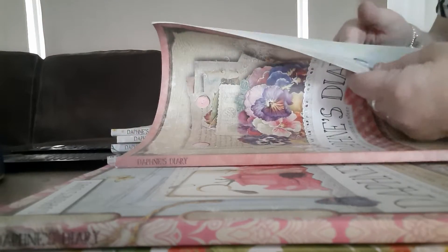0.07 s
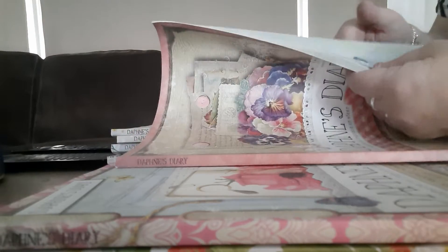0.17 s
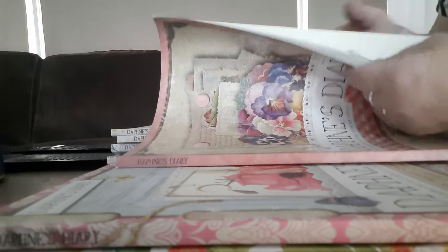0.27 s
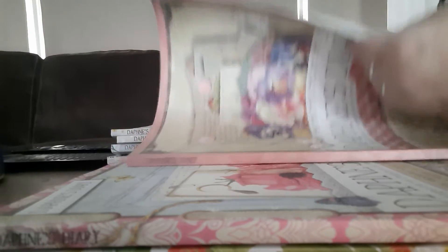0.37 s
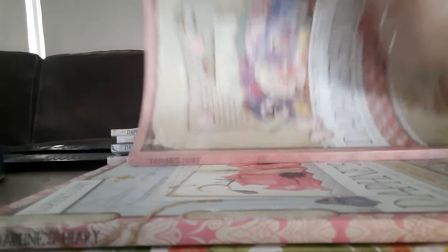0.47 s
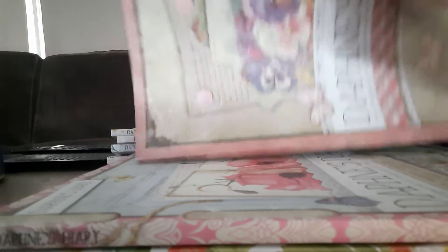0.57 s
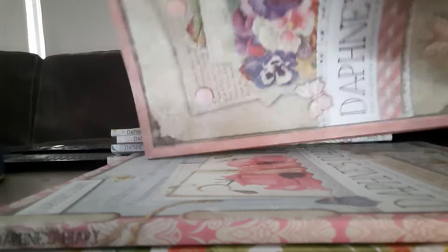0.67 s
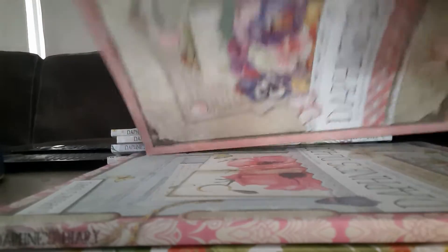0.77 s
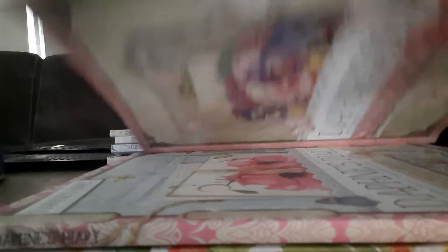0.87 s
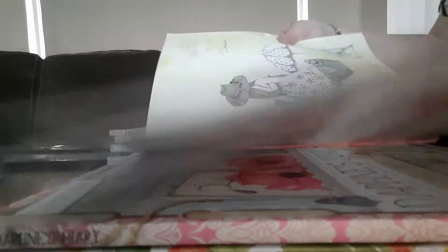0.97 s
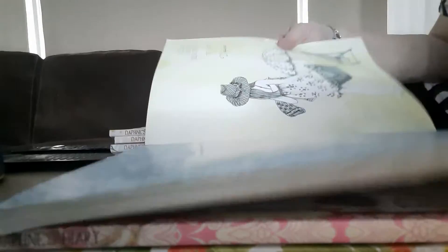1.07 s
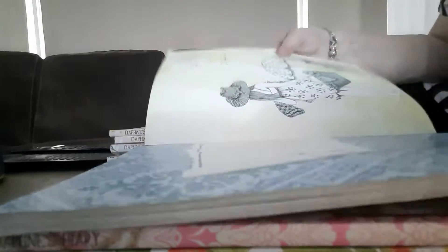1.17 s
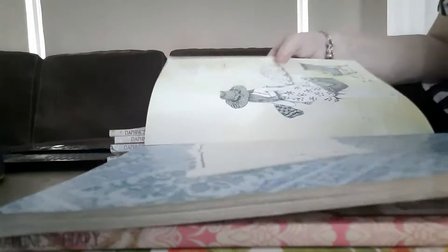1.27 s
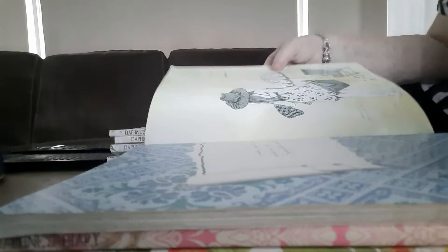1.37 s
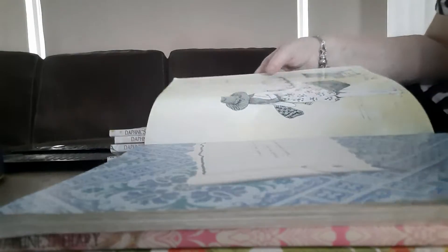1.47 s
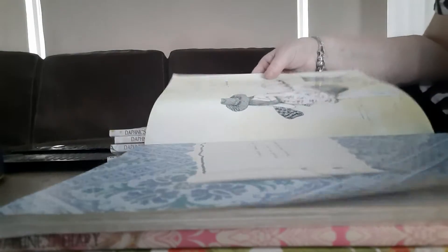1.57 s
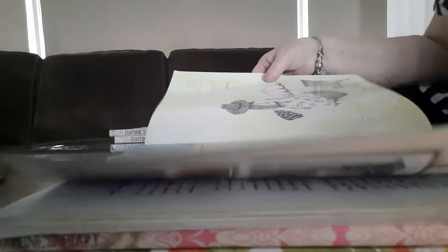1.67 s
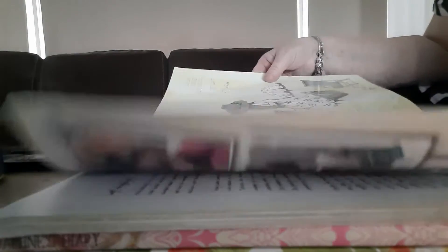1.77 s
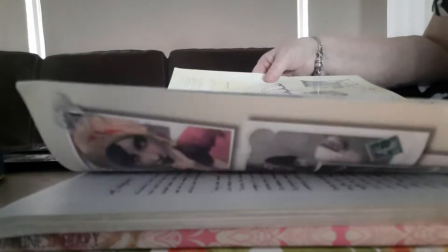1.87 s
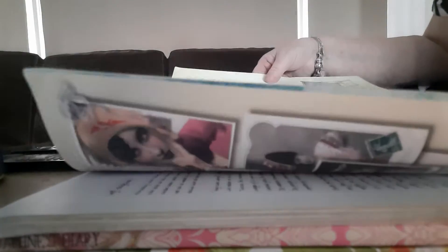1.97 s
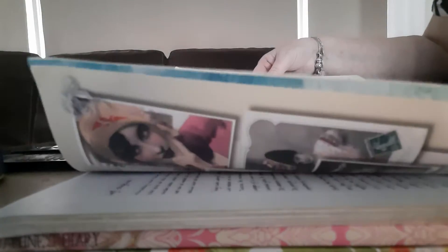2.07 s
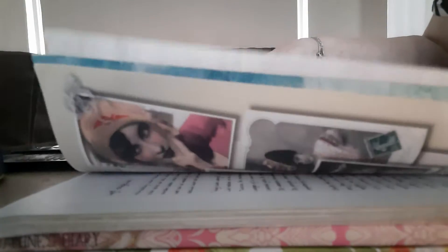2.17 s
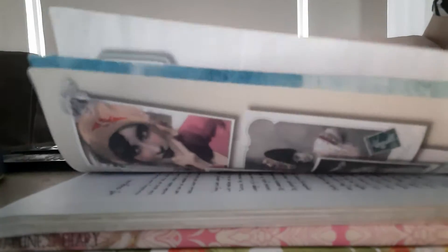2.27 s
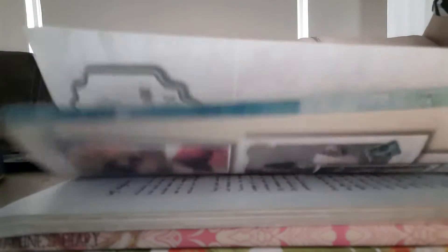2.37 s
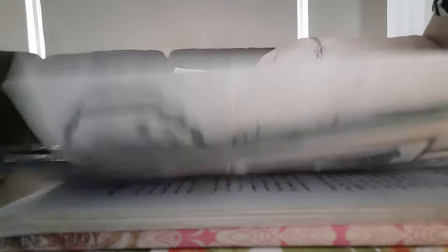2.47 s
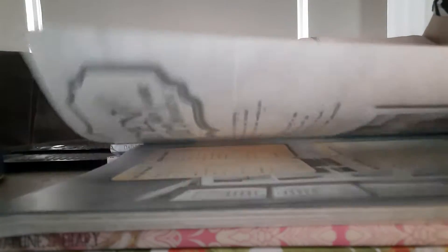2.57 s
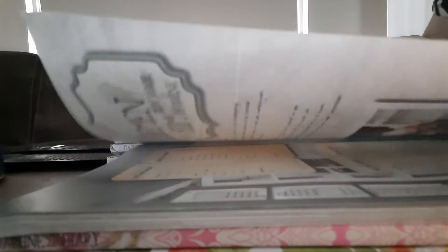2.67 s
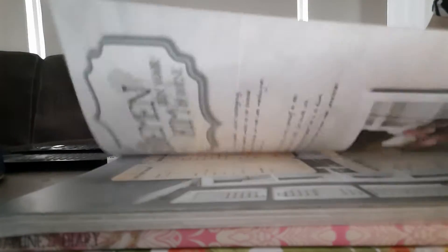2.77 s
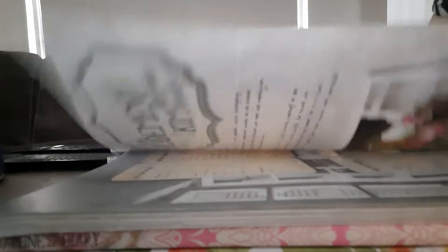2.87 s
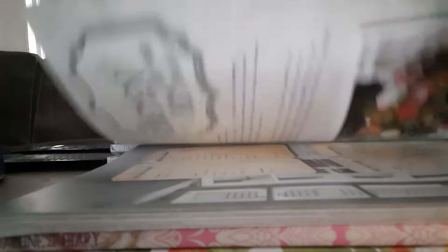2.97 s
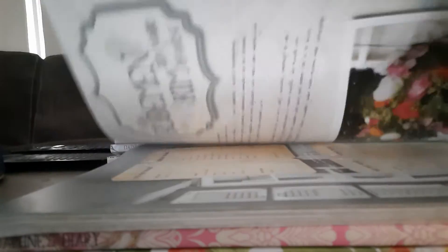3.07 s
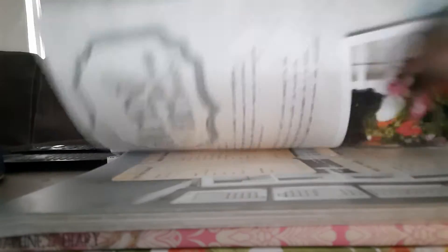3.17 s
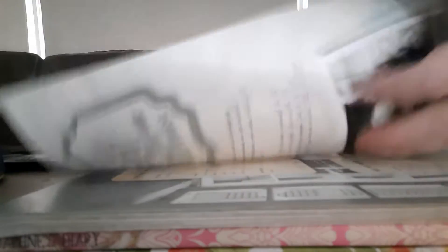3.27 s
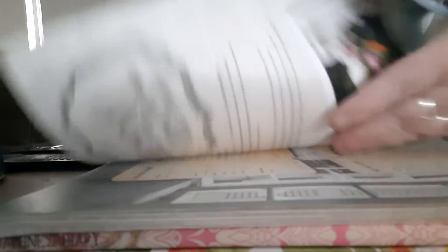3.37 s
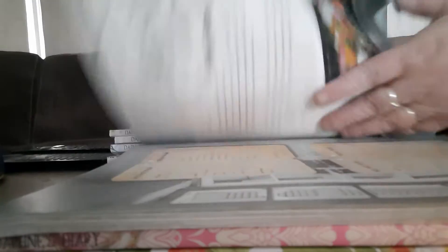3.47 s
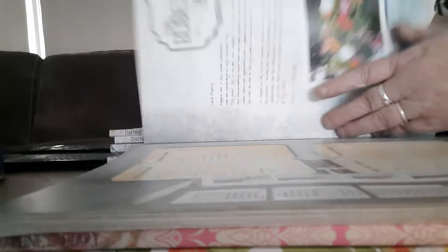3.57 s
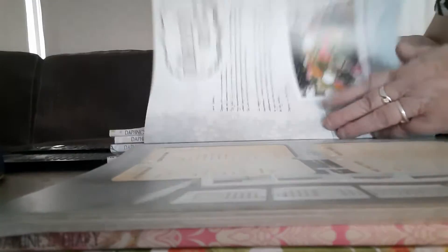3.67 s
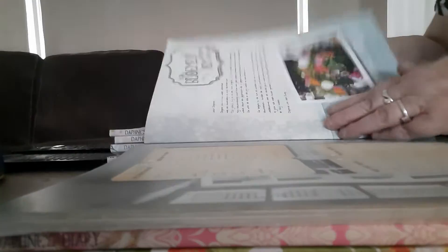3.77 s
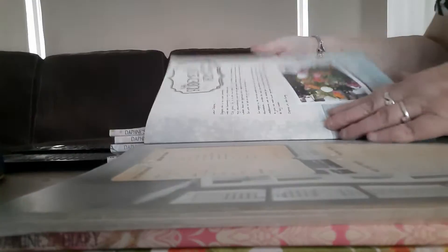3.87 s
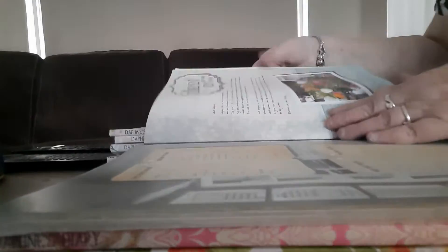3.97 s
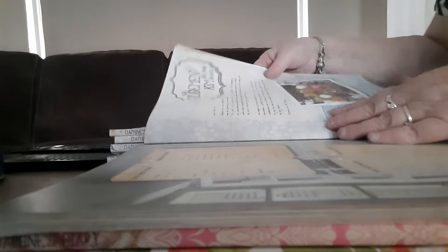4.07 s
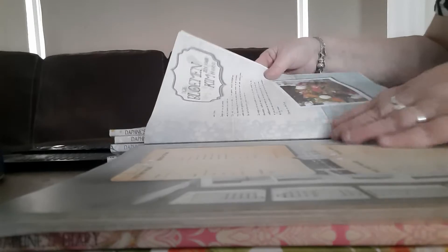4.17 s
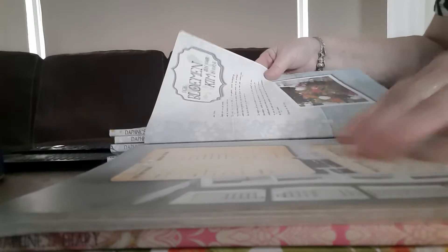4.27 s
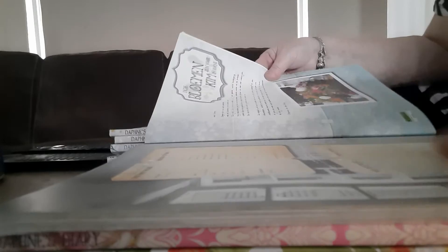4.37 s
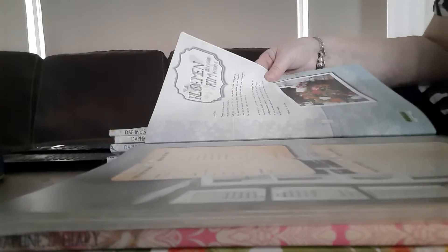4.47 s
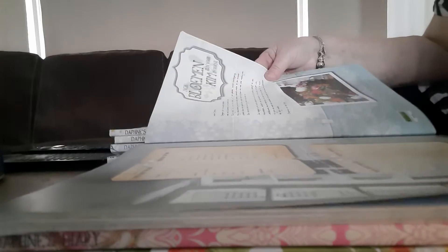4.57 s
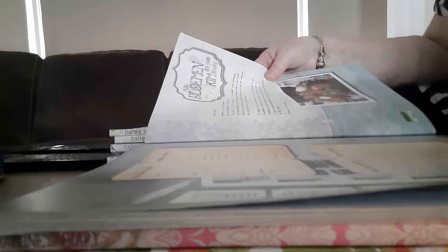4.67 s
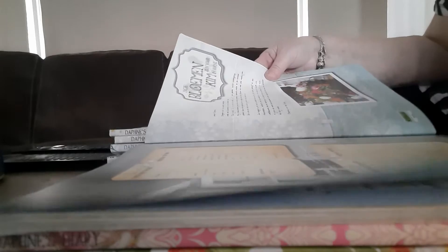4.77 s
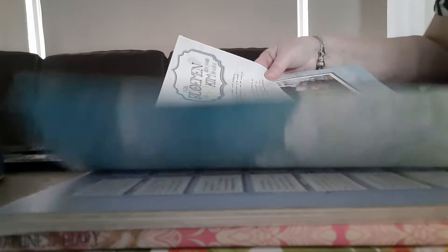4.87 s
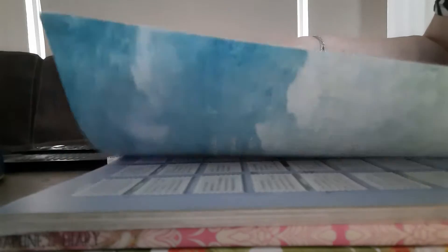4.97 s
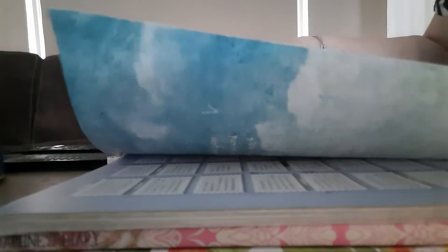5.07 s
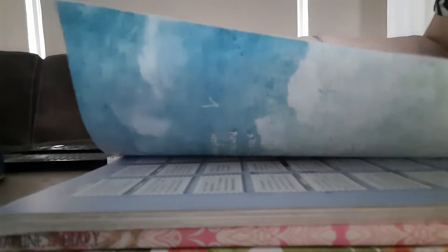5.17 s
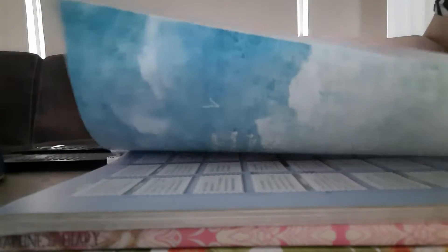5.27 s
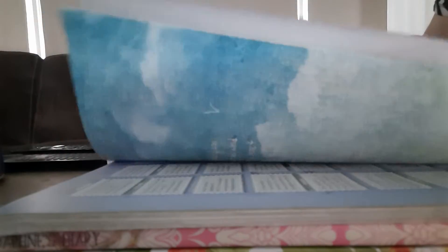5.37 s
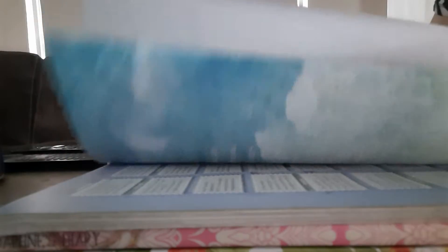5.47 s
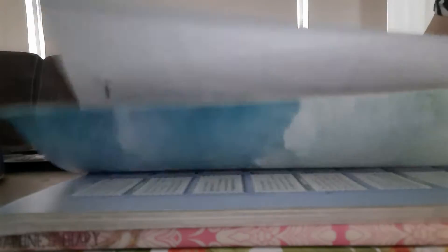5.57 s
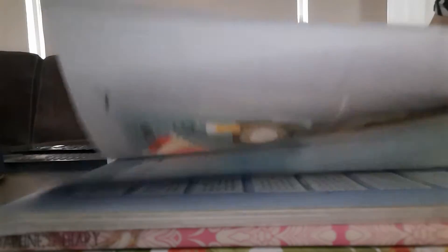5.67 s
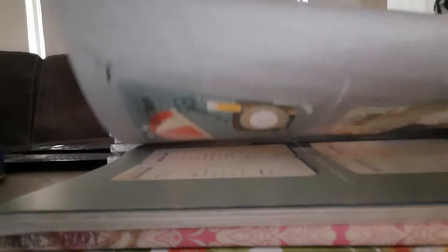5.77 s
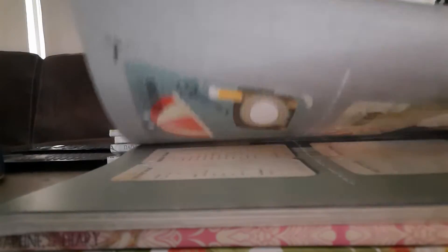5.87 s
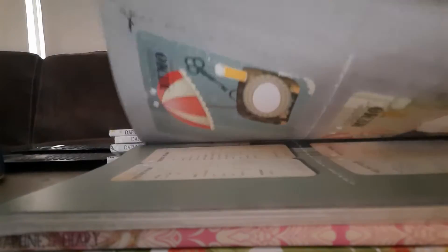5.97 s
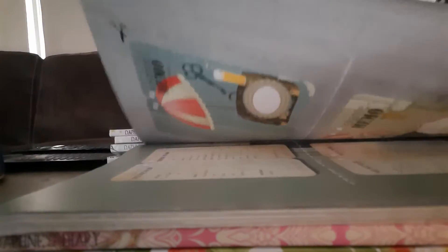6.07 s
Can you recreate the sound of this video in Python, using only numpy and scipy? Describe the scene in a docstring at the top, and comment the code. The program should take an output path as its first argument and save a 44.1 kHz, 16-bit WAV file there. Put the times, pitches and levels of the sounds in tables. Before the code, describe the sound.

Right beside a stereo microphone in a quiet living room, a glossy magazine is leafed through. Soft flaps and a faint bracelet tinkle come first, then hissing slides of paper. A cluster of hard snaps breaks out near the middle, rustling follows, then another sharp crack. After a quiet pause, gentle rubbing resumes and ends in a firmer flap.

```python
"""Faint room tone, then a soft flap and a snap: glossy magazine pages turned right beside a stereo microphone.
Sheets slide with a fine hiss and crackle (shaped noise), rumble softly as they bend (grainy noise), and buckle
with flaps and sharp snaps (short swings, trembling and cracks). Puffs of air thump low at the microphone.
A bracelet tinkles faintly early on (decaying sines); the living room answers the paper with a short tail."""
import sys
import numpy as np
from scipy import signal
from scipy.fft import rfft, irfft, next_fast_len
from scipy.io import wavfile

SR = 44100
rng = np.random.default_rng(int(sys.argv[2]) if len(sys.argv) > 2 else 0)


def file_out(sig):
    """Save sig as 16-bit WAV at sys.argv[1]."""
    # one column per channel
    cols = np.atleast_2d(sig).T
    # limit, then scale
    lim = np.clip(cols, -1, 1)
    pcm = np.round(lim * 32767).astype(np.int16)
    wavfile.write(sys.argv[1], SR, pcm)


N = 269142
TIME = np.arange(N) / SR   # seconds
FFT_SIZE = 2 * next_fast_len(N // 2 + SR // 2)   # padded so that filtering does not wrap round
FFT_HZ = np.maximum(np.arange(FFT_SIZE // 2 + 1) * SR / FFT_SIZE, 1)

# The two microphone ports. Each row: frequency in Hz, left-right level difference in dB,
# likeness of diffuse sound at the two ports (0 to 1).
PORTS = [(99.9, 3.5, 0.85), (730, -2, 0.99), (1590, -0.5, 0.12), (6000, 3, 0.18), (12800, -3.5, 0.11)]


def from_db(db):
    """Decibels to gain."""
    return 10 ** (np.asarray(db) / 20)


def rms_one(x):
    """Scale to unit power."""
    return x / np.sqrt(np.mean(x ** 2) + 1e-20)


def at_hz(points, hz, axis=1):
    """Read one column of a table on a log-frequency axis."""
    table = np.array(points)
    return np.interp(np.log(hz), np.log(table[:, 0]), table[:, axis])


def in_time(rows, axis=1):
    """Read one column of a curve at every sample."""
    table = np.array(rows)
    return np.interp(TIME, table[:, 0], table[:, axis])


def panned(db):
    """Left and right gains for a level difference."""
    return from_db(np.array([[.5], [-.5]]) * db)


def band(x, low_hz, high_hz):
    """Causal band-pass."""
    edges_hz = [low_hz, min(high_hz, SR * 9 / 20)]
    return signal.sosfilt(signal.butter(2, edges_hz, "band", fs=SR, output="sos"), x)


def drift(per_s):
    """Smooth chance with a spread near 1."""
    return np.interp(TIME * per_s, np.arange(SR // 2), rng.standard_normal(SR // 2))


def two_ports(mid, side, alike):
    """Mix two independent noises into a left-right pair of the given likeness."""
    return np.sqrt(1 + alike) * mid + np.sqrt(1 - alike) * side * [[1], [-1]]


def friction(spectrum, grain_db, grains_per_s):
    """Countless tiny slips of uneven size, coloured by a spectrum and partly alike at both ports; rms 1."""
    sizes = from_db(grain_db * drift(grains_per_s))
    slips = rfft(rng.standard_normal((2, N)) * sizes, FFT_SIZE)
    alike = np.clip(at_hz(PORTS, FFT_HZ, axis=2), 0, .99)
    pair = two_ports(slips[0], slips[1], alike)
    bass_loss = np.hypot(1, (spectrum[0][0] / FFT_HZ) ** 2)   # falls away below the first row
    colour = from_db(at_hz(spectrum, FFT_HZ)) / bass_loss
    return rms_one(irfft(pair * colour, FFT_SIZE)[:, :N])


def room_tone():
    """The quiet living room: steady, faint, mostly low noise."""
    # Each row: frequency in Hz, relative spectral level in dB per Hz.
    spectrum = [(35, -11.5), (100, -6), (200, -17), (330, -12), (1200, -24.5), (3000, -33.5), (8000, -25.5),
                (15000, -39)]
    return from_db(-72) * friction(spectrum, grain_db=0, grains_per_s=1)


def buckle(hz, swell_ms, crack_db, shiver_swells=7.36, crack_ms=1.8, clap_db=-7.5, sag=0.14, apart_hz=1550):
    """One panel flips and swings; the sheet shivers after it, claps on its neighbour and the crease cracks."""
    clean_cycles = 3.8   # a swell of more cycles than this breaks up into a crumple
    shiver = .45         # trembling of the sheet as a share of the swing
    t = np.arange(SR // 6) / SR
    age = t * 1000 / swell_ms   # in swells
    cycles = hz * swell_ms / 1000
    pitch = hz * (1 - sag * (1 - np.exp(-age / 2)))   # the panel slackens as it unloads

    apart = (hz / apart_hz) ** 2   # short waves reach the two ports out of step
    port_phase = np.pi * apart ** 2 / (1 + apart ** 2) * np.array([[0], [1]])
    phase = 2 * np.pi * np.cumsum(pitch) / SR - port_phase
    swing = -np.sin(phase) * age * np.exp(1 - age)
    swing /= 1 + (cycles / clean_cycles) ** 4

    noise = rng.standard_normal((6, len(t)))
    tremble = rms_one(band(noise[0] + 2 * apart * noise[1:3], hz * 0.43, hz * 1.41))
    tremble *= shiver * (1 - np.exp(-2 * age)) * np.exp(-age / shiver_swells)

    crack_age = age * np.sqrt(swell_ms / crack_ms)
    crack_swell = crack_age * np.exp(1 - crack_age)
    crease = from_db(-9.5) * rms_one(band(noise[3] + 2 * noise[4:], 2100, 8200))
    clap = from_db(clap_db) * rms_one(band(noise[3] + noise[4:] / 2, 1100, 1800))
    return swing + tremble + from_db(crack_db) * (crease + clap) * crack_swell


def buckles():
    """Every flap and snap, as a sheet buckles or slaps down, at its moment."""
    # Each row: start in seconds, level in dB, starting pitch in Hz, swell in ms,
    # crack in dB relative to that level.
    events = [ (0.126, -30.5, 668, 1.5, -0.5), (0.137, -28, 483, 1.86, -16), (0.550, -34, 620, 0.34, -15),
              (0.587, -42, 560, 0.73, -24), (0.6251, -38, 926, 0.31, -19), (0.644, -30.5, 993, 0.25, -28),
              (0.664, -33, 970, 0.28, -27), (0.762, -37, 438, 6.3, -27), (0.8048, -21.5, 640, 1.4, -34),
              (0.809, -23, 416, 1.65, -35), (0.821, -31, 630, 0.99, -28), (0.957, -32.5, 660, 0.96, -21),
              (1.095, -33, 664, 1.5, -27), (1.109, -32, 607, 1.2, -28), (1.387, -42, 580, 5.6, -22),
              (1.428, -28.5, 580, 1.1, -19), (1.436, -33, 570, 1.4, -32), (1.718, -34, 594, 1.17, -32.5),
              (2.399, -33, 603, 0.73, -9), (2.642, -31, 590, 0.6, -2), (2.748, -35, 462, 1.7, -35.5),
              (2.8177, -18.5, 404, 1.5, -14.5), (2.8584, -8.5, 750, 0.32, -18.5),
              (2.8805, -14.5, 540, 0.45, -13), (2.887, -15, 447, 1.14, -26.5),
              (2.8988, -5, 540, 0.55, -16.5), (2.9603, -10, 1510, 0.97, -39),
              (2.9672, -17.5, 700, 0.54, -18), (3.004, -23.5, 920, 1.4, -23), (3.181, -33, 700, 0.67, -3),
              (3.229, -28.5, 500, 1.7, 5.5), (3.259, -26.5, 400, 2.6, -11.5),
              (3.277, -16.5, 1220, 1.5, -9.5), (3.369, -32, 895, 1.7, -8), (3.623, -6, 3250, 0.55, -28),
              (3.6449, -9, 854, 1.7, -24.5), (3.646, -7.5, 3100, 0.27, -11.5),
              (3.648, -8, 1760, 1.07, -25.5), (3.658, -14, 840, 0.95, -20.5), (3.698, -27, 700, 1.5, -18.5),
              (3.731, -23, 925, 2.4, -26), (3.750, -25.5, 996, 2.6, -28), (3.771, -28.5, 910, 0.62, -28),
              (4.539, -50, 6190, 0.25, -21), (5.674, -31, 692, 1.1, 7), (5.894, -37.5, 600, 1.9, -13),
              (5.929, -29, 476, 0.31, -14.5), (5.945, -30, 348, 0.42, -15), (5.975, -29.5, 644, 0.57, -6.5),
              (6.0238, -14.5, 460, 0.47, -25), (6.042, -24.5, 344, 1.3, -13), (6.0702, -19, 420, 1.74, -13)]
    out = np.zeros((2, N + SR))
    for s, db, hz, swell_ms, crack_db in events:
        sound = from_db(db) * buckle(hz, swell_ms, crack_db)
        start = round(s * SR)
        out[:, start:start + sound.shape[1]] += sound
    return out[:, :N]


def puffs():
    """A fanning sheet pushes air at the microphone: each push swells quickly and ebbs as a soft low thump."""
    # Each row: start in seconds, level in dB, swell in seconds.
    pushes = [(0.131, -41.5, 0.0089), (0.8, -35.5, 0.0056), (1.204, -40.5, 0.017), (1.293, -44.5, 0.022),
              (1.426, -27.5, 0.0054), (2.89, -23.5, 0.0093), (3.258, -31, 0.0075), (3.641, -28.5, 0.0071),
              (6.05, -34.5, 0.062)]
    # Each row: frequency in Hz, relative spectral level in dB per Hz.
    spectrum = [(45, -6.5), (85, 2), (150, -4.5), (240, -19.5), (600, -49.5)]
    push = 0
    for s, db, swell_s in pushes:
        age = np.clip((TIME - s) / swell_s, 0, 20)
        push = push + from_db(db) * age * np.exp(1 - age)
    return push * friction(spectrum, grain_db=0, grains_per_s=1)


def room(x, first_wall_s=0.012):
    """A diffuse tail that dies band by band, sooner in the treble."""
    # The room's answer. Each row: frequency in Hz, relative level in dB, time to fall by 60 dB in seconds.
    answer = [(60, -7.5, 1), (208, 3, 0.24), (329, -3, 0.32), (2080, -7, 0.33), (3900, 8.5, 0.12),
              (15970, -17, 0.12)]
    t = np.arange(SR * 2 // 3) / SR
    edges, tail = np.geomspace(45, 16000, 13), 0
    for low, high in zip(edges, edges[1:]):
        hz = np.sqrt(low * high)
        mid, side = band(rng.standard_normal((2, len(t))), low, high)
        alike = 1 / (1 + (hz / 900) ** 2)   # long waves reach both ports alike
        fall_db = at_hz(answer, hz) - 60 * t / at_hz(answer, hz, axis=2)
        tail = tail + two_ports(mid, side, alike) * from_db(fall_db)
    # silent until the first wall answers, then fading in
    tail = tail * np.clip(t / first_wall_s - 1, 0, 1) / np.sqrt(SR / 20)
    return signal.fftconvolve(x, tail, axes=1)[:, :N]


def movement(start, swell_s, ebb_s, swell_db, ebb_db):
    """Gain of one movement: it takes hold, swells, ebbs and lets go; a slow one has soft edges."""
    grip_share, let_go_s = 0.137, 0.0027   # taking hold as a share of the swell; the quickest letting go
    age, grip_s = TIME - start, grip_share * swell_s
    arch_db = np.interp(age, [0, swell_s, swell_s + ebb_s], [-swell_db, 0, -ebb_db])
    edge = np.minimum(age / grip_s, (swell_s + ebb_s - age) / np.hypot(let_go_s, grip_s))
    return from_db(arch_db) * np.exp(np.clip(edge, -20, 0))


def warped(x, gap_ms=0.7, sway=.35, sways_per_s=12, bounce=.48):
    """Facing page and table mirror the sound; as the sheet moves, their notches wander through it; rms 1."""
    for path_ms in (gap_ms, np.pi * gap_ms):
        lag = path_ms * np.exp(sway * drift(sways_per_s)) * SR / 1000   # samples
        x = x + bounce * x[:, np.arange(N) - lag.astype(int)]
    return rms_one(x)


def crackle(catches_per_s=380, spread_db=2.5):
    """Edges and creases catch and spring free in tiny ticks of uneven size; rms 1."""
    catches = rng.random(N) < catches_per_s / SR
    boost_db = spread_db * np.minimum(rng.exponential(1, N), np.pi)
    sizes = from_db(boost_db) * rng.standard_normal((2, N))
    return rms_one(band(catches * sizes + 1e-18, 900, 5000))


def sliding(drum_growth=1.94, uneven_db=2.0, tugs_per_s=65, crackle_db=-7):
    """Paper drags on paper: the sheet radiates the low rub, the surface the hiss."""
    # Each row: start in seconds, swell in seconds, ebb in seconds, hiss level in dB ahead of the layer gains,
    # rub of the whole sheet in dB and fine hiss of the gloss in dB, both relative to the hiss.
    slides = [ (0.139, 0.0072, 0.17, -61, -6.5, 4), (0.40, 0.1, 0.35, -58, -0.5, -2),
              (0.804, 0.02, 0.18, -61, 12.5, 4), (0.87, 0.15, 0.2, -52.5, -1, -2),
              (1.225, 0.039, 0.02, -49.5, 5.5, 1.5), (1.3, 0.091, 0.3, -68.5, -3, 6.5),
              (1.696, 0.034, 0.17, -46, -2.5, 2.5), (1.959, 0.034, 0.029, -34.5, -0.5, -8),
              (2.062, 0.045, 0.1, -47, 7, -2), (2.184, 0.048, 0.21, -44, 6.5, -0.5),
              (2.299, 0.13, 0.038, -47.5, 9.5, -7), (2.48, 0.071, 0.066, -40, 4, -1),
              (2.659, 0.044, 0.022, -51.5, 1, 4.5), (3.04, 0.056, 0.003, -42.5, 2.5, -8.5),
              (3.182, .04, 0.125, -35.5, 2, -5), (3.36, 0.03, 0.075, -42, 2, 0),
              (3.445, 0.1, 0.14, -36.5, -2, 1), (3.651, 0.019, 0.26, -56.5, -1, -6),
              (4.21, 0.21, 0.15, -53.5, -20, 4.5), (4.771, 0.11, 0.036, -62, -16, -6),
              (4.882, 0.093, 0.064, -48.5, 2.5, -2.5), (5.276, 0.023, 0.63, -48.5, -3.5, -0.5),
              (5.35, 0.19, .09, -52.5, 15.5, 1), (5.55, 0.035, 0.052, -44.5, 5.5, -3),
              (5.64, 0.082, .012, -43.5, 6.5, 2), (5.745, 0.038, .008, -47, 3, 1.5)]
    # Four spectra. Each row: frequency in Hz, relative spectral level in dB per Hz.
    rub_spectrum = [(300, -23.5), (850, 0.5), (1200, -9), (1850, 3.5), (2400, -4.5), (3300, -9),
                    (5000, -21.5), (9000, -45.5)]
    drum_spectrum = [(400, -3.5), (700, -11), (1200, -9.5), (2200, -12.5), (5000, -43)]
    hiss_spectrum = [(1000, -24), (2500, -10), (4300, 3), (5800, 5), (8200, 5), (9400, -13), (12000, -28)]
    gloss_spectrum = [(5000, -15), (9000, 0.5), (11500, 0.5), (14000, 1)]
    power = np.zeros((4, N))
    for start, swell_s, ebb_s, db, rub_db, gloss_db in slides:
        pull = movement(start, swell_s, ebb_s, swell_db=9.5, ebb_db=13.5)
        # in broad contact the whole sheet acts as a drum skin and the rub deepens
        layers_db = db + np.array([rub_db, drum_growth * rub_db, 0, gloss_db])
        power += np.outer(from_db(layers_db) ** 2, pull ** 2)
    rub = from_db(-2.0) * warped(friction(rub_spectrum, grain_db=2.0, grains_per_s=690))
    rub = rub + from_db(crackle_db) * crackle()
    drum = from_db(-13.5) * friction(drum_spectrum, grain_db=2.5, grains_per_s=400)
    hiss = from_db(0.5) * warped(friction(hiss_spectrum, grain_db=1.5, grains_per_s=1100))
    gloss = from_db(-3.0) * friction(gloss_spectrum, grain_db=-0.9, grains_per_s=940)
    tug = from_db(uneven_db * drift(tugs_per_s))   # the hand's pull is never quite even
    return tug * sum(gain * layer for gain, layer in zip(np.sqrt(power), (rub, drum, hiss, gloss)))


def bracelet():
    """Each touch sets one small link ringing, with a phase of its own at each port."""
    # Each row: start in seconds, level in dB, pitch of the link in Hz.
    touches = [(0.157, -38, 6840), (0.203, -46, 14600), (0.323, -48, 6920), (0.69, -53.5, 6950)]
    link_t60_s = 0.12
    out = np.zeros((2, N))
    for s, db, hz in touches:
        age = np.clip(TIME - s, 0, 1)
        phase = 2 * np.pi * rng.random((2, 1))
        ring = from_db(db - 60 * age / link_t60_s) * np.sin(2 * np.pi * hz * age + phase)
        out += (age > 0) * ring
    return out


def bending():
    """A curved sheet gives way in many soft, dull jolts; its taut part rings higher up."""
    # Each row: start in seconds, swell in seconds, ebb in seconds, level in dB ahead of the overall gain,
    # ring of the taut part in dB relative to that level.
    bends = [ (0.491, 0.011, 0.16, -51.5, -3.5), (0.81, 0.016, 0.17, -52.5, -1.5),
             (1.71, 0.0095, 0.17, -59.5, 2.5), (1.965, 0.032, 0.032, -51, -5), (2.22, 0.21, 0.24, -52, 3),
             (2.65, 0.042, 0.14, -45.5, -14), (2.86, 0.026, 0.14, -39, -7.5),
             (3.228, 0.02, 0.21, -50.5, -17), (3.626, 0.022, 0.15, -39, -4.5),
             (3.885, 0.035, 0.043, -52, -2), (4.122, 0.02, 0.038, -67.5, 1.5),
             (4.94, 0.065, 0.11, -71.5, 9), (5.281, 0.15, 0.3, -49.5, 5.5),
             (5.872, 0.18, 0.053, -46, -13.5)]
    # Each row: frequency in Hz, relative spectral level in dB per Hz.
    spectrum = [(45, -5.5), (90, 0.5), (210, -9), (320, 2), (450, -6.5), (750, -10), (1100, -25.5),
                (2000, -28), (6000, -49)]
    slack, taut = 0, 0
    for start, swell_s, ebb_s, db, taut_db in bends:
        strain = from_db(db) * movement(start, swell_s, ebb_s, swell_db=0, ebb_db=6.5)
        slack = slack + strain
        taut = taut + strain * from_db(taut_db)
    low, high = (friction(spectrum, grain_db=6.5, grains_per_s=180) for _ in range(2))
    return from_db(2.5) * (slack * low + taut * rms_one(band(high, 650, 1500)))


def placed(pair):
    """The paper moves about the microphone: its sound reaches the left port first, its balance wanders."""
    # Each row: time in seconds, left-right level difference in dB, lag of the right port in ms.
    path = [(0.9, -2, 0.05), (1.6, 3.5, 0.22), (2.3, 2, 0.22), (2.9, 0.5, 0.1), (3.62, -1, 0.07),
            (4.4, -2, 0.08), (4.95, 2, 0.23), (6.0, -1.5, 0.16)]
    lag = np.round(in_time(path, axis=2) * SR / 1000)   # samples
    right = np.interp(np.arange(N) - lag, np.arange(N), pair[1])
    return np.array([pair[0], right]) * panned(in_time(path))


def scene():
    """Paper and bracelet close by, the quiet room around them; only rustle and snaps draw the room's answer."""
    tone = room_tone()
    snaps = buckles()
    air = puffs()
    rustle = sliding() + bending()
    echo = room(from_db(-10.0) * rustle + from_db(-8.0) * snaps)
    return placed(rustle + snaps + air) + bracelet() + echo + tone


def record(dry, ceiling=1.2, low_cut_hz=50):
    """Ports colour each side; deep bass and a treble band are reduced, peaks rounded and the top cut."""
    cutoff_hz = 16050
    dry = irfft(rfft(dry, FFT_SIZE) * panned(at_hz(PORTS, FFT_HZ)), FFT_SIZE)[:, :N]
    dry = signal.sosfilt(signal.butter(2, low_cut_hz, "high", fs=SR, output="sos"), dry)
    notch = signal.lfilter(*signal.iirnotch(9600, 5.0, fs=SR), dry)
    dipped = dry + 0.62 * (notch - dry)   # a partial notch
    coloured = ceiling * np.tanh(dipped / ceiling)
    return signal.sosfilt(signal.ellip(10, .2, 80, cutoff_hz, fs=SR, output="sos"), coloured)


dry = scene()
out = record(dry)
file_out(out)
```